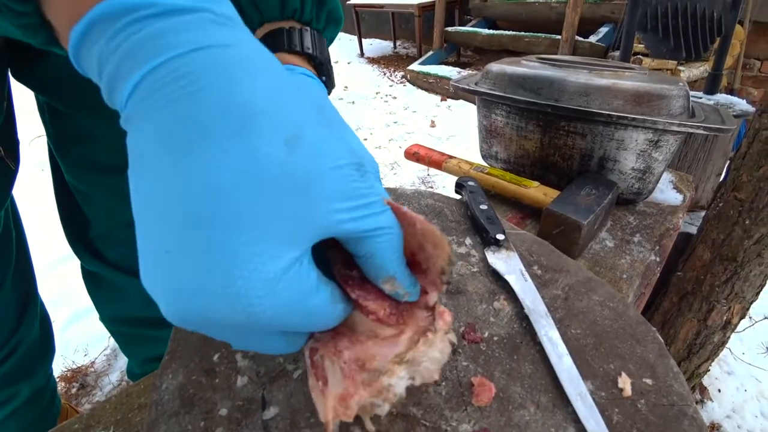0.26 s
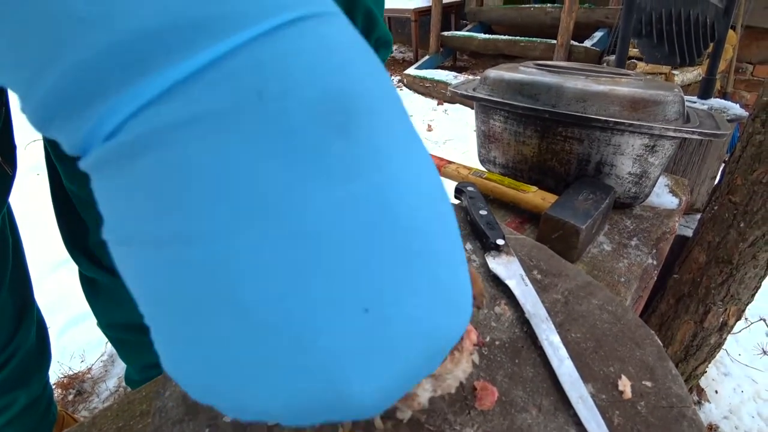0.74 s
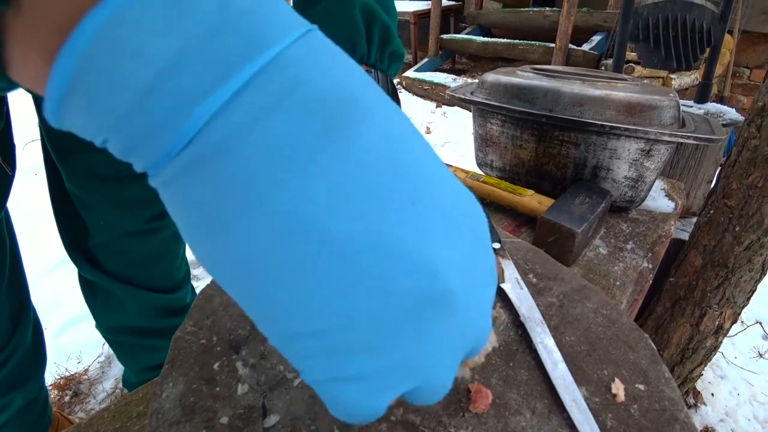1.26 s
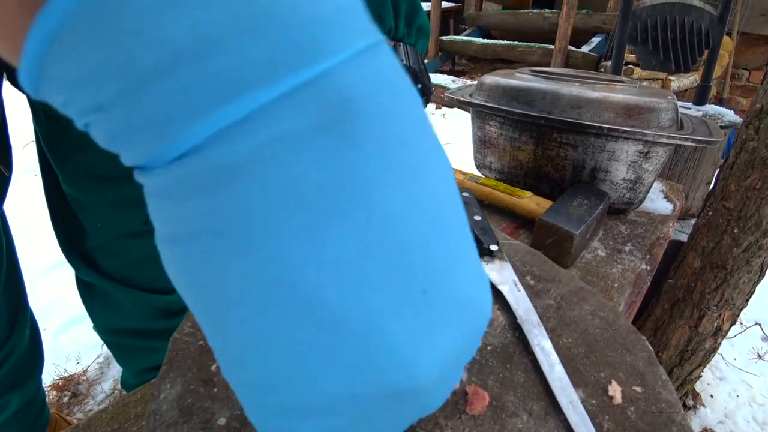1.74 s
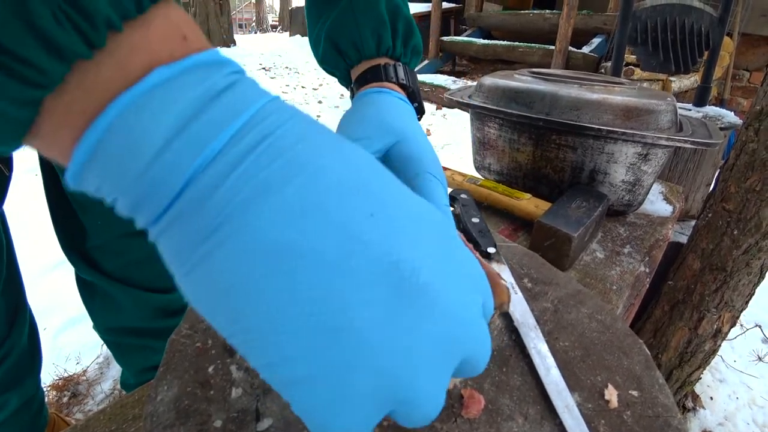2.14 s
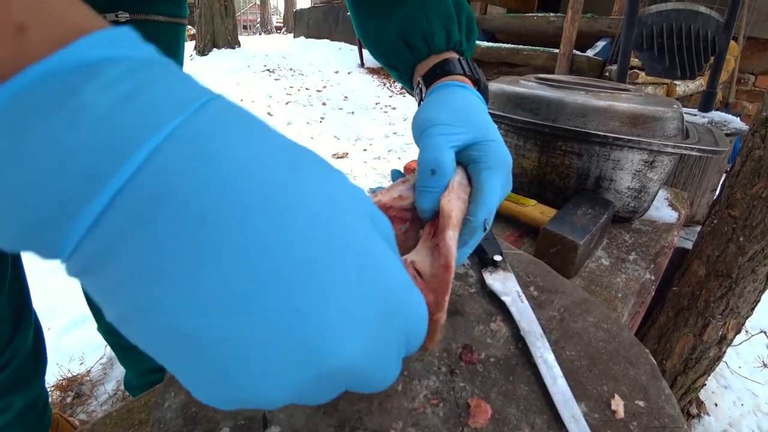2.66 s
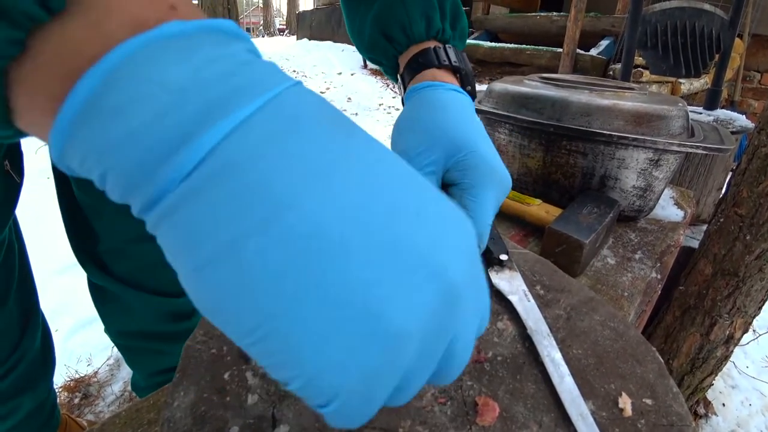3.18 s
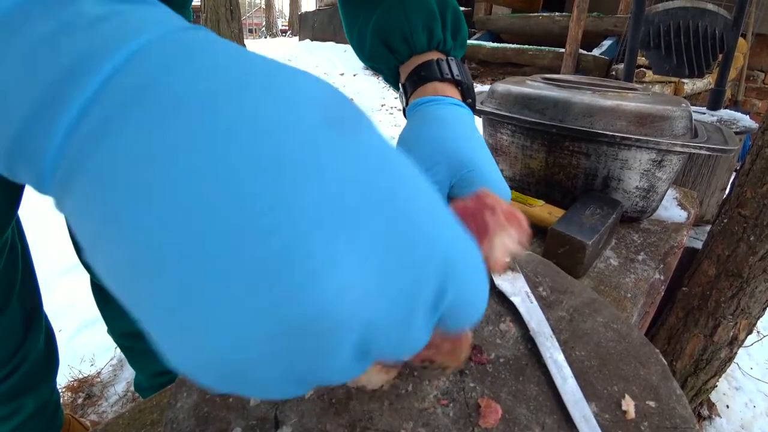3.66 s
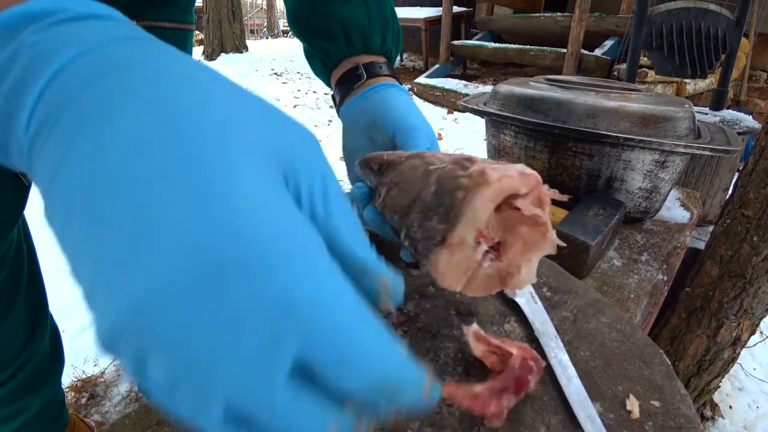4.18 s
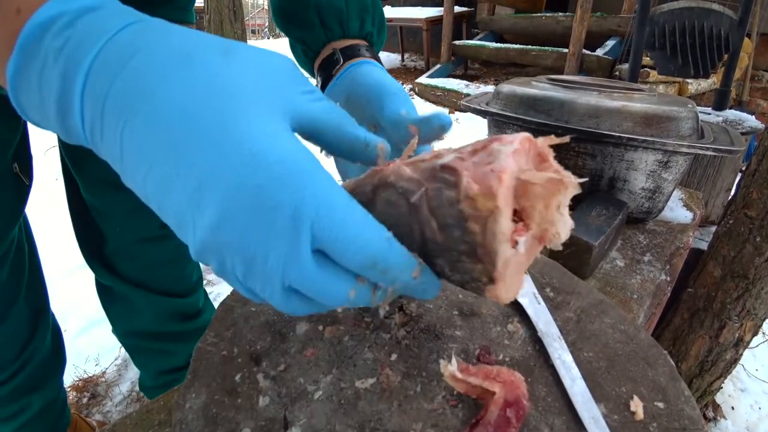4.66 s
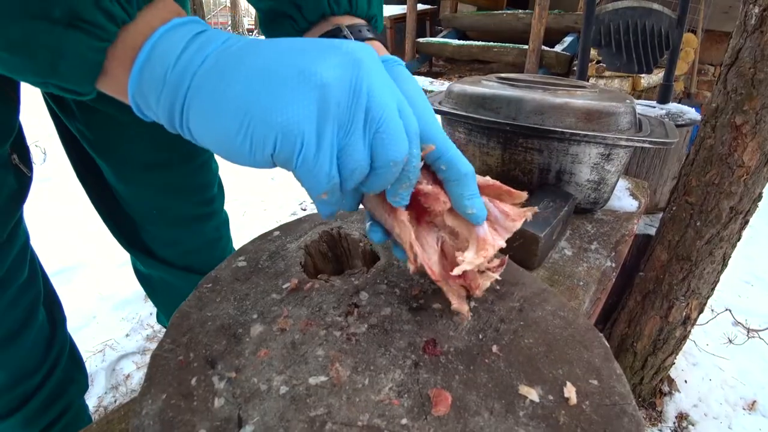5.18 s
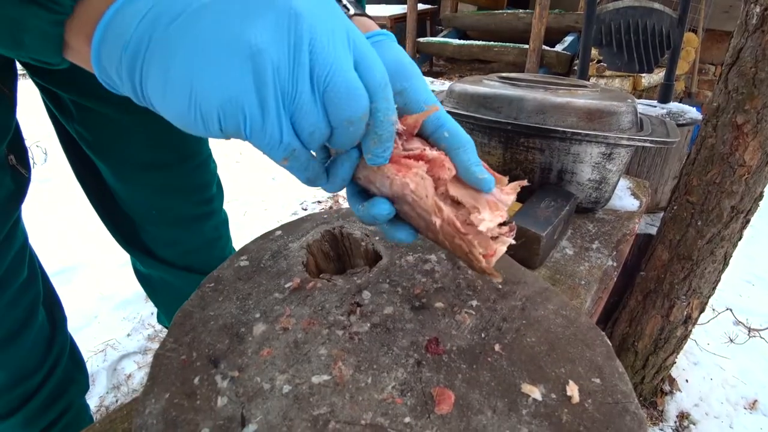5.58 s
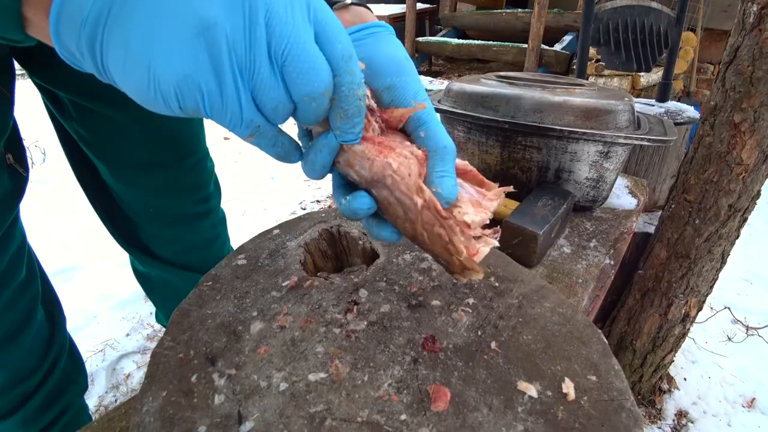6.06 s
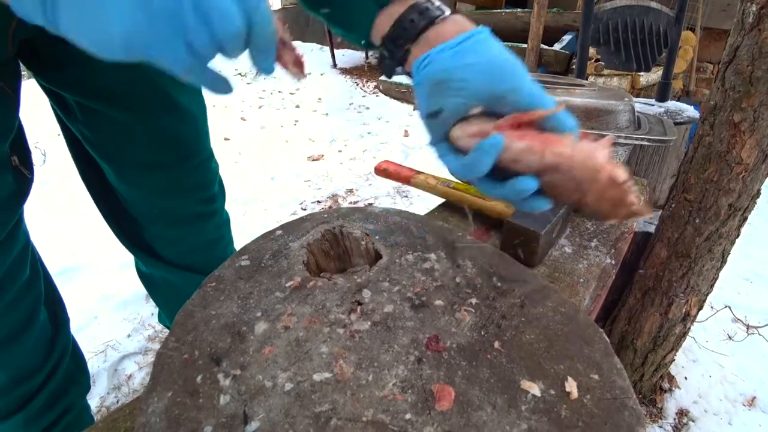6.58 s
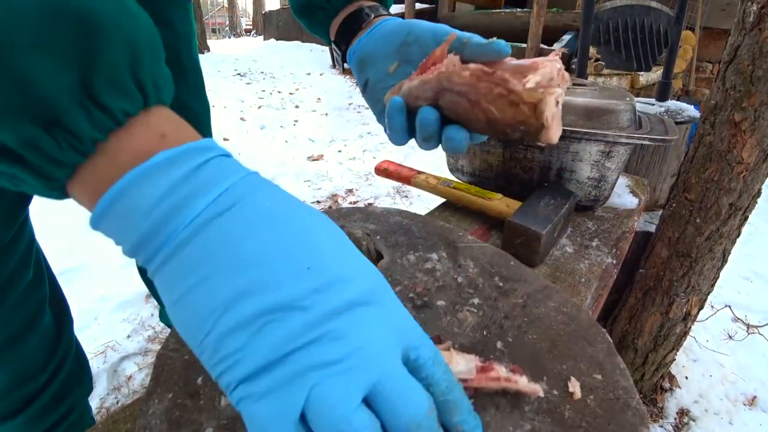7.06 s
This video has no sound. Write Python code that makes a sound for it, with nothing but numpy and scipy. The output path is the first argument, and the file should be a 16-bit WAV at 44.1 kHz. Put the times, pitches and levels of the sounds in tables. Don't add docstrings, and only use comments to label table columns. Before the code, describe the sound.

Outdoors in a quiet winter yard, microphones sit right by the hands. Rubber gloves rub and faintly squeak on wet skin while icy flesh rips in clumps of tiny snaps. Bright brittle cracks come in bursts, with quieter kneading between. Pieces knock on the stump, which gives short woody thuds and low creaks. The strongest rip comes near the end, over a soft air bed and far road hum.

```python
import sys
import numpy as np
from scipy import signal
from scipy.fft import irfft
from scipy.io import wavfile
from scipy.ndimage import uniform_filter1d

SR = 44100
rng = np.random.default_rng(int(sys.argv[2]) if len(sys.argv) > 2 else 0)


def put_to_file(sound):
    columns = np.atleast_2d(sound).T
    safe = np.clip(columns, -1, 1)
    whole_steps = np.round(safe * 32767)
    wavfile.write(sys.argv[1], SR, whole_steps.astype(np.int16))


def makeup_ratio(level_db):
    decades = np.asarray(level_db, float) / 20
    return 10 ** decades


N = 322812


def evened(x):
    return x / np.sqrt(np.mean(x ** 2) + 1e-20)


def read(points, hz):
    f, value = np.transpose(points)
    return np.interp(np.log(hz + 1), np.log(f + 1), value)


def add(mix, s, sound):
    part = mix[round(s * SR):][:len(sound)]
    part += sound[:len(part)]


def drift(shape, *spans):
    x = rng.standard_normal(shape)
    for axis, span in enumerate(spans):
        size = max(round(span), 1)
        x = uniform_filter1d(uniform_filter1d(x, size, axis), size, axis)
    return evened(x)


def ring(hz, t60, rise, length):
    t = np.arange(round(length * SR)) / SR
    return makeup_ratio(-60 * t / t60) * (1 - np.exp(-t / rise)) * np.sin(2 * np.pi * hz * t)


def band(x, lo_hz, hi_hz):
    return signal.sosfilt(signal.butter(2, [lo_hz, hi_hz], "band", fs=SR, output="sos"), x)


def swells(rows):
    stroke_db = 12
    t = np.arange(0, N + 64, 64) / SR
    s, db, rise, fall = np.array([r[:4] for r in rows]).T[:, :, None]
    return t, db - stroke_db * np.maximum((s - t) / abs(rise), (t - s) / abs(fall))


def tearing(snaps_per_s=220, spread_db=3.5, clump_db=2.0, colour_db=2.0, crumble_s=0.0025):
    # pitch_hz, level_db [dB per Hz]
    tearing_colour = [(240, -19), (600, -17), (1400, -11), (2400, -7), (4200, -4), (6000, -2), (7700, 1),
                      (8700, -4.5), (12500, -3), (15500, -15.5), (16200, -42)]
    # start_s, resting_contact_db, thick_flesh_depth_db, wet_glove_fizz_db
    grip = [(0, -46, 2, -6), (.35, -55, 1.5, -5.5), (.72, -44.5, -9.5, -16), (.87, -51, -2, -16.5),
            (1.2, -44.5, -5, -11.5), (1.75, -52, 2, -11.5), (2.25, -51.5, -.5, -7), (2.8, -48, -7, -13.5),
            (3.25, -47.5, -2, -11), (3.7, -58, -7, -12.5), (3.93, -68, -6, -10.5), (4.4, -52.5, -10.5, -14),
            (4.75, -78, -5.5, -7.5), (5.6, -49.5, -4.5, -5), (6.1, -47, -7, -6.5), (6.45, -43.5, -16, -8.5),
            (7.05, -53, -2.5, -10.5), (7.32, -64, -21, -38)]
    # peak_s, effort_db, rise_s, fall_s, crackle_share [0-1]
    tears = [(1.371, -37.5, 0.073, 0.031, 0.2), (1.413, -32, 0.016, 0.031, 0.43),
             (1.47, -41, 0.03, 0.075, 0.3), (2.013, -41.5, 0.062, 0.045, 0.22),
             (2.095, -41, 0.063, 0.14, 0.23), (3.423, -37, .06, 0.11, 0.3), (3.48, -33, 0.06, 0.078, 0.2),
             (4.009, -49, 0.046, 0.69, 0.21), (5.455, -39.5, 0.11, 0.094, 0.32),
             (5.881, -41, 0.11, 0.24, 0.03), (6.594, -16.5, 0.021, 0.024, 0.1),
             (7.143, -25.5, 0.016, 0.0096, 0.3)]
    # peak_s, effort_db, rise_s, fall_s
    rubs = [(0, -41, .1, 0.072), (.308, -42.5, 0.094, 0.064), (.425, -40.5, 0.068, 0.069),
            (.531, -34.5, 0.063, 0.039), (.65, -30, 0.046, 0.033), (.869, -44, 0.33, 0.57),
            (.875, -40, 0.057, 0.034), (1.124, -39, 0.086, 0.08), (1.675, -42, 0.19, 0.037),
            (2.24, -43.5, 0.074, 0.48), (2.383, -41, 0.017, 0.021), (2.636, -45, 0.24, 0.26),
            (2.763, -36, 0.061, 0.32), (2.82, -35.5, 0.11, .035), (2.951, -36, 0.044, 0.05),
            (3.046, -31, 0.016, 0.013), (3.289, -37.5, 0.058, 0.05), (3.513, -24, .012, 0.011),
            (3.522, -23, .01, .008), (3.537, -19.5, 0.036, 0.013), (3.614, -36, 0.036, 0.1),
            (3.848, -46, 0.048, 0.043), (4.435, -37.5, 0.014, 0.0092), (4.503, -32, .01, 0.019),
            (4.588, -35, 0.058, 0.045), (4.737, -33, 0.029, 0.019), (4.922, -42, 0.2, 0.83),
            (5.587, -42, 0.027, 0.2), (6.311, -40, 0.06, 0.045), (6.43, -37.5, 0.17, 0.32),
            (6.62, -17.5, 0.04, 0.0096), (7.058, -40, 0.037, 0.17), (7.154, -31, .015, .008)]
    rub_crackle = 0.077
    smooth_db = -34

    s, rest_db, depth_db, fizz_db = np.transpose(grip)
    t = np.arange(N) / SR
    at, stroke_db = swells(tears + rubs)
    effort_db = np.maximum(stroke_db.max(axis=0), np.interp(at, s, rest_db))

    torn = (np.array(tears)[:, 4:] * makeup_ratio(stroke_db[:len(tears)] - effort_db)).max(axis=0)
    crackle = np.maximum(torn, rub_crackle) * makeup_ratio(-np.maximum(effort_db - smooth_db, 0))
    share = np.clip(np.interp(t, at, crackle), 0, 1)

    snap_sizes = makeup_ratio(spread_db * np.minimum(rng.exponential(size=N), 4))
    snaps = snap_sizes * (rng.random(N) < snaps_per_s / SR)
    snaps = evened(signal.lfilter([1], [1, -makeup_ratio(-60 / (crumble_s * SR))], snaps))
    drive = (np.sqrt(share) * snaps + np.sqrt(1 - share)) * rng.standard_normal(N)
    drive *= makeup_ratio(clump_db * drift(N, 420))

    hz, frames, z = signal.stft(drive, SR, nperseg=128, noverlap=96)
    deep = 1 / (1 + (hz / 4300) ** 4)
    fizzy = 1 / (1 + (8600 / (hz + 1)) ** 6)
    crunch = np.exp(-((hz - 4100) / 900) ** 2)
    tilt_db = np.outer(deep, np.interp(frames, s, depth_db) + 6.5)
    tilt_db += np.outer(fizzy, np.interp(frames, s, fizz_db) + 4)
    tilt_db += np.outer(crunch, 16 * np.interp(frames, t, share))
    z *= makeup_ratio(read(tearing_colour, hz)[:, None] + colour_db * drift(z.shape[::-1], 5.0, 2.5).T)
    z /= np.sqrt(np.mean(abs(z) ** 2))
    sound = signal.istft(z * makeup_ratio(tilt_db), SR, nperseg=128, noverlap=96)[1][:N]
    return sound * makeup_ratio(uniform_filter1d(np.interp(t, at, effort_db), 300) - 18.0)


def breaks():
    # start_s, peak_db, lump_hz, splinter_over_lump_db
    thick_ice = [(0.0835, -16, 4820, -1), (1.1726, -21, 4690, -5), (1.3674, -14, 4550, -12),
                 (1.3786, -13.5, 3400, -1), (1.407, -12.5, 4150, -6), (1.418, -15, 3300, -6),
                 (1.425, -14, 4050, 1), (1.466, -13, 4500, -8), (1.9202, -22, 4400, -6),
                 (1.9944, -19, 4340, -8), (2.015, -6, 4100, -11.5), (2.0356, -18.5, 3360, 3),
                 (2.1792, -8, 4400, -6.5), (2.1814, -12, 3830, -7), (3.0433, -15.5, 2240, -4.5),
                 (3.461, -11, 4570, -10), (3.4774, -13, 3980, 2), (3.5003, -11, 4460, 2),
                 (4.1735, -18.5, 4400, -4.5), (4.3434, -24, 4170, 1.5), (4.835, -9, 3040, 0),
                 (5.29, -12, 5040, 3), (5.8192, -12.5, 4150, 2), (6.5686, -8.5, 5060, -5)]
    # start_s, peak_db, lump_hz, splinter_hz
    thin_ice = [(.0669, -17, 2280, 11100), (0.0774, -10.5, 4500, 6930), (.419, -18, 2380, 8570),
                (0.528, -17, 4900, 5800), (0.9244, -18, 1410, 5650), (1.115, -24, 4330, 5730),
                (1.354, -15.5, 4570, 7160), (1.41, -10.5, 3660, 6150), (2.2053, -20, 3120, 7150),
                (3.039, -19, 4840, 11100), (3.4707, -6.5, 4150, 6640), (3.487, -8, 3560, 7580),
                (4.8489, -19.5, 2260, 6600), (4.9225, -17, 4610, 5840), (5.0704, -15.5, 2470, 7330),
                (5.2058, -19, 4900, 5840), (5.2551, -17.5, 4310, 10600), (5.4562, -9.5, 4800, 6400),
                (5.4892, -15, 2660, 7410), (5.5746, -12, 3970, 9000), (5.784, -13, 3930, 11340),
                (5.8805, -10, 2900, 7200), (5.8989, -11.5, 3750, 8700), (6.3776, -11, 5170, 7340),
                (6.5625, -3.5, 5150, 7200), (6.575, -12, 4930, 6240), (6.7167, -7.5, 2310, 6450),
                (7.051, -20.5, 5260, 11000)]
    # start_s, peak_db, splinter_hz
    ice_ticks = [(0.137, -32, 5670), (.6718, -31, 6400), (.946, -27, 7190), (2.094, -27, 6550),
                 (2.15, -23, 6700), (2.439, -23.5, 7500), (2.974, -26, 7360), (3.1137, -23, 6600),
                 (3.177, -26, 7270), (3.7452, -26.5, 7160), (3.836, -28, 5600), (4.914, -21, 6240),
                 (4.9276, -18.5, 10200), (4.992, -22, 6040), (5.2143, -15.5, 5400), (5.2496, -23, 6220),
                 (5.277, -19, 6150), (5.4751, -17.5, 5300), (5.5787, -17, 10500), (5.5819, -13, 7260),
                 (5.686, -25, 12400), (6.0296, -22, 9800), (6.2816, -22, 7490), (6.3484, -20.5, 7060),
                 (6.3687, -17, 6850), (6.4284, -19, 7500), (6.9535, -26, 6000), (7.145, -19, 6800)]
    splinter_hz, thin_db = 6700, 8.5
    tick_lump_hz, tick_db = 4800, 9
    rows = [(s, db, hz, splinter_hz * makeup_ratio(1.0 * rng.standard_normal()), over_db)
            for s, db, hz, over_db in thick_ice]
    rows += [(s, db, low_hz, hz, thin_db) for s, db, low_hz, hz in thin_ice]
    return rows + [(s, db, tick_lump_hz, hz, tick_db) for s, db, hz in ice_ticks]


def cracking(body_hz=1750, body_db=-12):
    out = np.zeros(N)
    for (s, db, low_hz, high_hz, high_db), dice in zip(breaks(), rng.standard_normal((200, 400))):
        snap = ring(low_hz, 0.0022, 0.00019, .009)
        snap += makeup_ratio(high_db) * ring(high_hz, 0.002, .0001, .009)
        snap -= makeup_ratio(body_db) * ring(body_hz * makeup_ratio(1.1 * dice[-1]), 0.0029, 0.00062, .009)
        snap += makeup_ratio(high_db - 6.5) * ring(min(1.445 * high_hz, 14000), 0.002, .0001, .009)
        crumbs = 0.077 * dice[:len(snap)] * makeup_ratio(-60 * np.arange(len(snap)) / SR / 0.02)
        crumbs[4] += .6
        snap += band(crumbs, 790, np.clip(9500 + 450 * high_db, 5000, 17000))
        add(out, s, makeup_ratio(db) * snap / abs(snap).max())
    return out


def chipping(rows, cycles, grit_db, trim_db):
    out = np.zeros(N)
    for (s, db, hz), dice in zip(rows, rng.standard_normal((len(rows), 500))):
        chip = ring(hz, cycles / hz, 1.3 / hz, 2 * cycles / hz)
        grit = band(dice * makeup_ratio(-60 * np.arange(len(dice)) / SR / 0.0098), 2100, 12000)
        add(out, s, makeup_ratio(db + trim_db) * chip / abs(chip).max())
        add(out, s, makeup_ratio(db + trim_db + grit_db) * grit)
    return out


def small_chips():
    # start_s, peak_db, pitch_hz
    chip_hits = [(0.0028, -28, 2860), (0.0078, -26, 3320.0), (0.042, -22, 6120.0),
                 (0.0889, -23.0, 6680.0), (0.101, -24, 6800.0), (0.1362, -26, 4870.0),
                 (0.3042, -26, 7060), (0.4581, -28, 6980.0), (0.4978, -28, 5600.0), (0.5325, -19, 6070.0),
                 (0.5946, -24.5, 6070.0), (0.6063, -28, 6200.0), (0.6484, -20.5, 5000.0),
                 (0.6717, -26, 5170.0), (0.7014, -24.5, 4400), (0.8086, -31.5, 2890.0),
                 (0.8947, -25, 3270), (1.1171, -26.5, 6030.0), (1.1232, -24.0, 4570.0),
                 (1.1827, -25.5, 3500), (1.2413, -30, 5810.0), (1.276, -27, 4170),
                 (1.2968, -27.5, 7060.0), (1.3354, -26, 4480.0), (1.3424, -30, 3700.0),
                 (1.3495, -26.0, 4310.0), (1.36, -15, 4690.0), (1.3653, -21, 4350.0),
                 (1.373, -16, 4440.0), (1.3769, -18, 3570.0), (1.3895, -24, 4820.0),
                 (1.4025, -20.5, 1680.0), (1.4041, -23, 2710.0), (1.4294, -17.0, 6680.0),
                 (1.4319, -20, 4280), (1.4518, -20, 9170.0), (1.4536, -32, 3530.0),
                 (1.4626, -23.5, 4350.0), (1.4692, -20, 4440.0), (1.4734, -16, 4570.0),
                 (1.4878, -19, 9560.0), (1.5123, -26, 3100.0), (1.5142, -29, 3530.0), (1.578, -25, 4850),
                 (1.7725, -29.5, 3900), (2.0244, -24.0, 4480.0), (2.0749, -21, 3450.0),
                 (2.2034, -26, 4130.0), (2.2244, -24, 4390.0), (2.2935, -33, 7150.0),
                 (2.7636, -19, 6980.0), (2.8031, -22.0, 6550.0), (2.8234, -32, 6680.0),
                 (3.026, -22, 4820.0), (3.403, -14, 6590.0), (3.4182, -16.0, 4310.0), (3.4222, -21, 3960),
                 (3.4304, -21, 6330.0), (3.4465, -19, 6850.0), (3.4483, -20, 7240.0),
                 (3.4516, -24.5, 7320.0), (3.4628, -20, 4350.0), (3.465, -22, 4650.0),
                  (3.4746, -17.5, 6890.0), (3.4798, -14.0, 6800.0), (4.0126, -26, 6460.0),
                  (4.5867, -29, 5930), (4.7388, -19, 7340), (4.8543, -28, 2340), (5.1346, -21.5, 6340),
                  (5.1925, -22, 5600.0), (5.2236, -22, 5340.0), (5.2407, -24.5, 4910.0),
                  (5.295, -24, 4910.0), (5.3205, -26.0, 7620.0), (5.3602, -25, 4390.0),
                  (5.4012, -23, 4690.0), (5.4174, -25, 7580.0), (5.42, -21, 7360.0),
                  (5.4222, -26.5, 5600.0), (5.4275, -22, 7540.0), (5.431, -27, 7750.0),
                  (5.4429, -27, 7490.0), (5.4448, -27.0, 7540.0), (5.4469, -22.0, 6930.0),
                  (5.4497, -19, 3160), (5.4713, -20.0, 7150.0), (5.4876, -20, 6370.0), (5.5863, -12, 7550),
                  (5.871, -20, 6330.0), (5.8827, -18, 9130.0), (5.886, -14, 6850), (5.9921, -23.5, 6000),
                  (6.0737, -24, 7540.0), (6.1992, -27.5, 7240.0), (6.3057, -23, 7450.0),
                  (6.3821, -25, 7320.0), (6.3862, -17, 7450.0), (6.4065, -27.0, 6370.0),
                  (6.4135, -23.5, 6980.0), (6.4178, -20, 5400), (6.4227, -27.5, 5300.0),
                  (6.432, -23, 7880.0), (6.439, -23, 5300.0), (6.4446, -25.5, 5250.0),
                  (6.4501, -28.0, 5170.0), (6.4527, -26.0, 7580.0), (6.4562, -25.0, 6720.0),
                  (6.464, -23, 7800.0), (6.4704, -20, 6630.0), (6.4759, -23, 7920.0), (6.4911, -26, 6720.0),
                  (6.5011, -24, 7240.0), (6.5075, -25, 7410.0), (6.514, -21, 10510.0),
                  (6.5184, -30, 6850.0), (6.5201, -28.5, 6800.0), (6.5547, -24.5, 7750.0),
                  (6.5773, -12, 5900.0), (7.1339, -23, 2240.0)]
    return chipping(chip_hits, cycles=9.7, grit_db=-6, trim_db=-3.0)


def frozen_chunks():
    # start_s, peak_db, pitch_hz
    chunk_hits = [(.808, -39, 2410), (.9243, -30.5, 2600), (3.3878, -21, 3900), (3.3892, -24, 3600),
                  (3.3968, -17.5, 3660), (3.3968, -15, 6900), (3.4012, -14.5, 4300), (3.4012, -13, 7300),
                  (3.4256, -8.5, 3680), (3.4281, -12.5, 3830), (3.4281, -11, 6500), (1.4025, -19, 3600),
                  (1.3729, -30, 2190), (1.4297, -25, 2530), (4.3425, -40, 523), (4.4165, -41, 477),
                  (5.0698, -25.5, 5250), (3.568, -38, 1900), (6.555, -34, 1930), (6.5635, -19.5, 1850),
                  (6.5925, -11, 6900), (6.5955, -7, 7700), (6.597, -13, 6800), (6.619, -17, 7400),
                  (2.128, -29, 3000), (2.2865, -27, 3100), (4.4255, -40, 1750), (4.889, -29, 5000),
                  (4.908, -31, 4500), (4.9435, -32, 3500), (5.009, -29, 9000), (5.156, -29, 6000),
                  (5.184, -31, 5600), (6.734, -28, 4000), (7.1322, -26, 600), (7.134, -28.5, 1230),
                  (7.137, -31, 1710), (7.157, -41, 1150), (7.1425, -33, 565)]
    return chipping(chunk_hits, cycles=14.3, grit_db=-12, trim_db=-2)


def squeak(rough_db=6.5):
    # start_s, length_s, from_hz, to_hz, level_db
    slips = [
        (.945, .06, 1450, 1300, -53),
        (.975, .075, 1290, 1560, -49),
        (2.7, .12, 1000, 1200, -50),
        (2.72, .1, 700, 800, -54),
    ]
    out = np.zeros(N)
    for s, length, from_hz, to_hz, db in slips:
        n = round(length * SR)
        hz = np.linspace(from_hz, to_hz, n) * (1 + 0.046 * drift(n, 90))
        level = makeup_ratio(db + rough_db * drift(n, 110) - 1.5) * np.hanning(n)
        add(out, s, level * np.sin(2 * np.pi * np.cumsum(hz) / SR))
    return out


def stump():
    # start_s, peak_db, blow_ms, ring_factor [ratio], dull_thud_db
    landings = [(1.401, -41.5, 1, 1.2, -7), (2.707, -43, 1.4, 1.35, 9), (2.867, -54, 3.9, 1, 7),
                (3.5416, -13.5, 0.76, 0.954, 6), (3.555, -28, 2.3, 0.736, -9),
                (4.1742, -18, 0.34, 1.09, -15), (4.185, -31, 0.39, 1.4, -1), (4.3425, -30, 0.55, 1.07, 6),
                (4.416, -33.5, 0.89, 1.04, 0), (4.434, -35.5, 0.46, 1, -4), (6.606, -33, 0.75, 1.03, -2),
                (7.1324, -22.5, 0.29, 1, -18), (7.139, -39, 1.2, 1.12, -26)]
    # pitch_hz, level_db, t60_s
    wood_modes = [(222, -1, 0.04), (421.6, 3.5, 0.046), (547, 13.5, 0.014), (700, -4.5, 0.033),
                  (1000, -7.5, 0.038), (1270, -23, 0.023), (2130, -36, 0.013)]
    # start_s, peak_db
    shoves = [(0.004, -47.5), (0.438, -51), (0.711, -54), (2.236, -51.5), (2.856, -56), (2.963, -48),
              (3.54, -36), (4.171, -47.5), (4.343, -51), (4.418, -56), (6.578, -58), (7.135, -43)]
    thud_hz, thud_t60 = 158, 0.023
    rock_hz, rock_t60 = 68.8, 0.54
    out = np.zeros(N)
    for s, db, blow_ms, factor, thud_db in landings:
        blow = np.hanning(max(round(blow_ms * SR / 1000), 3))
        wood = sum(makeup_ratio(g) * ring(hz * factor, t60, 0.0016, .12) for hz, g, t60 in wood_modes)
        thud = makeup_ratio(thud_db) * ring(thud_hz, thud_t60, 0.00063, .12)
        knock = np.convolve(wood - thud, blow)
        add(out, s, -makeup_ratio(db) * knock / abs(knock).max())
    for s, db in shoves:
        add(out, s, makeup_ratio(db + 4.5) * ring(rock_hz, rock_t60, 0.0023, .6))
    return out


def pressing():
    # peak_s, rumble_db, rise_s, fall_s, creak_over_rumble_db
    hand_leans = [(0, -60, .1, 3.8, 12.5), (1.43, -64, .8, .15, 18), (1.66, -51, 0.075, 0.089, 11),
                  (2.26, -54.5, 0.26, 0.1, 9), (2.92, -50.5, 0.22, 0.21, 5.5), (3.54, -54, 0.11, 0.17, 9.5),
                  (4.19, -62.5, .25, .2, -7), (4.4, -54, 0.071, 0.062, 8), (5.6, -64.5, 1.6, .8, -6),
                  (6.6, -60, 0.23, 0.22, 14), (7.32, -61, 0.91, .1, 9.5)]
    s, lean_db = swells(hand_leans)
    rumble_db = lean_db.max(axis=0)
    creak_db = (lean_db + np.array(hand_leans)[:, 4:]).max(axis=0)
    t = np.arange(N) / SR
    lumps = rng.standard_normal(N) * makeup_ratio(4.4 * drift(N, 640))
    rumble = evened(band(lumps, 127, 273)) * makeup_ratio(np.interp(t, s, rumble_db) - 4.0)
    creak = evened(band(lumps, 343, 834)) * makeup_ratio(np.interp(t, s, creak_db) - 10.5)
    return rumble + creak


def yard():
    # pitch_hz, level_db [dB per Hz]
    air_colour = [(20, 2.5), (65, -2.5), (150, -10), (500, -11), (1200, -9.5), (2900, -20), (7500, -20),
                  (13900, -22), (15600, -25), (16200, -40)]
    # pitch_hz, width_hz, level_db
    far_hums = [
        (1005, 40, -67),
        (1956, 19, -68),
    ]
    # pitch_hz, likeness [-1 to 1]
    likeness = [(60, 1), (130, 0.53), (300, -0.0053), (640, -0.6), (1400, 0.13), (6800, 1), (15000, -0.49)]
    air_db = -55
    frames, hz = N // 256 + 5, np.fft.rfftfreq(1024, 1 / SR)
    a, b, c, d = rng.standard_normal((frames, len(hz), 4)).T
    same = np.clip(read(likeness, hz), -1, 1)[:, None]
    left = a + 1j * b
    z = np.array([left, same * left + np.sqrt(1 - same ** 2) * (c + 1j * d)])
    patches = makeup_ratio(4.6 * drift((frames, len(hz)), 8, 10).T)
    hum = sum(makeup_ratio(db) ** 2 / width * np.exp(-((hz - f) / width) ** 2) for f, width, db in far_hums)
    air = makeup_ratio(read(air_colour, hz)) ** 2
    air *= makeup_ratio(air_db) ** 2 / (air.sum() * hz[1])
    z = z * np.sqrt(air[:, None] * patches + hum[:, None])
    sound = signal.istft(z, nperseg=1024, noverlap=768)[1][:, :N]
    return evened(sound) * np.sqrt((air + hum).sum() * hz[1])


def ports(x, offside, echo_db):
    # pitch_hz, lead [radians]
    port_lead = [(0, -1.6), (780, 1.89), (1030, 1.16), (2670, 0.77), (9300, -0.82), (13100, -0.6),
                 (16500, 3)]
    # pitch_hz, level_db
    port_lean = [(200, 0), (800, 1.5), (2400, -0.7), (5500, -0.7), (9000, 2), (11500, 2)]
    hz = np.fft.rfftfreq(512, 1 / SR)
    phase = .5j * offside * read(port_lead, hz) * np.minimum(hz / 420, 1) ** 2
    half = makeup_ratio(read(port_lean, hz) / 2) * np.exp(phase)
    pair = np.roll(irfft([half, 1 / half]), 256, axis=1) * np.hanning(512)
    echoes = rng.standard_normal((2, 1200)) * makeup_ratio(-60 * np.arange(1200) / SR / 0.017)
    echoes = np.diff(echoes, prepend=0) * (np.arange(1200) > 30)
    echoes *= makeup_ratio(echo_db) / np.linalg.norm(echoes[0])
    direct = signal.oaconvolve(x[None], pair, axes=1)[:, 256:N + 256]
    return direct + signal.oaconvolve(x[None], echoes, axes=1)[:, :N]


def scene():
    hands = tearing() + cracking() + squeak()
    hands += small_chips() + frozen_chunks()
    sway = .2 * np.diff(hands, prepend=0) * drift(N, 500)
    near = ports(hands, 0.85, echo_db=-17.5) + np.outer([1, -1], sway)
    wood = ports(stump() + pressing(), .55, echo_db=-30)
    return near + wood + yard()


def band_limit(x):
    return signal.sosfilt(signal.butter(12, 16970, fs=SR, output="sos"), x)


def record(dry):
    ceiling, edge_hz = .95, 16800
    edge = signal.firwin(255, edge_hz, window=("kaiser", 9), fs=SR)
    limited = ceiling * np.tanh(dry / ceiling)
    return band_limit(signal.oaconvolve(limited, edge[None], "same", axes=1))


dry = scene()
out = record(dry)
put_to_file(out)
```